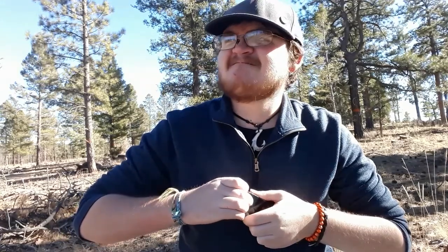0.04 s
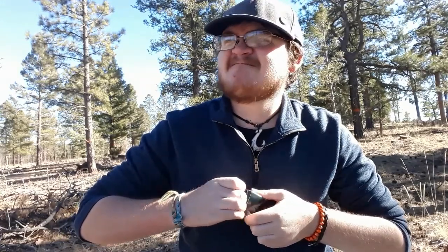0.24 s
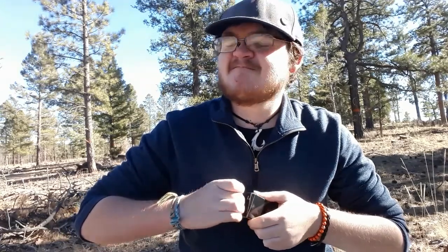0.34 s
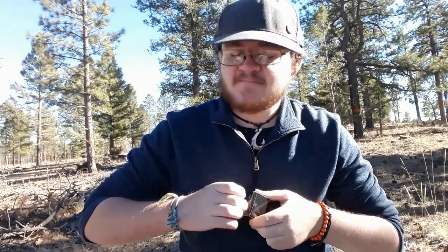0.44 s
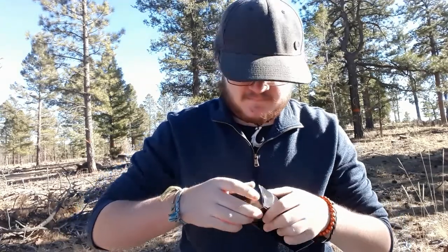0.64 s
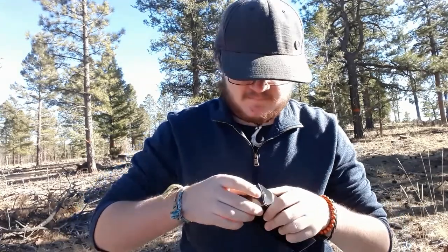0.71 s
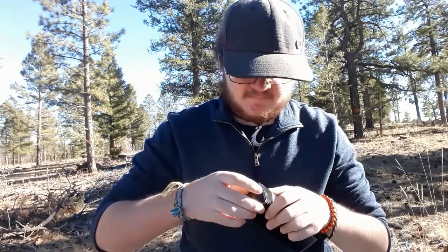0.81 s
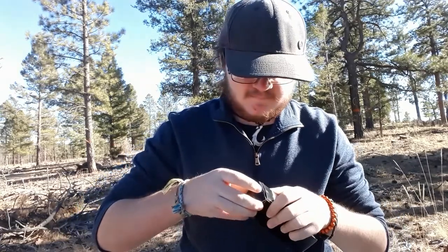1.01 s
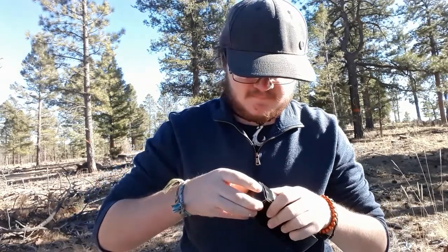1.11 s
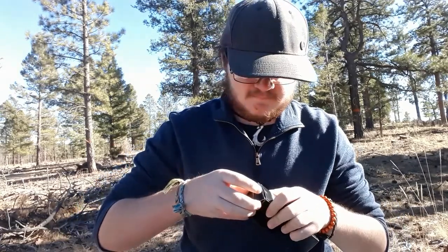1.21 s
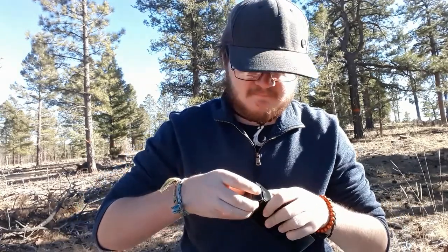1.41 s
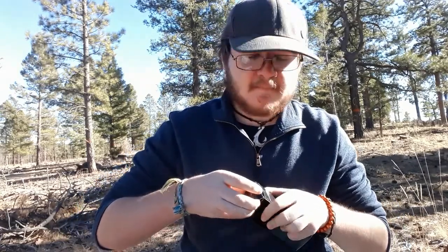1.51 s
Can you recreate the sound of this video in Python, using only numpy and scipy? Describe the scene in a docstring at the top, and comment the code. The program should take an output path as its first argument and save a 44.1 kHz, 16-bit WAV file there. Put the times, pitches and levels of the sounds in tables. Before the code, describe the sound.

A small metal tin is pried open by hand: a tick, a very short scrape and a sharp snap as the lid comes free. Later the loose lid clicks faintly. It is heard close, in quiet outdoor air.

```python
"""The tight lid of a small metal tin, pried off by hand in a quiet wood.
The rim ticks, scrapes in a short run of slips and snaps free. Contacts and slips ring the modes
of the thin metal; the fingers choke them at once. Later the loose lid clicks faintly.
Below: soft handling bumps, skin friction, a weak echo of trees, a low rumble of air, a faint hiss."""
import sys
import numpy as np
from scipy import signal
from scipy.fft import rfft, irfft, next_fast_len
from scipy.io import wavfile

SR = 44100
rng = np.random.default_rng(int(sys.argv[2]) if len(sys.argv) > 2 else 0)


def unload_audio(sound):
    """Save the sound as a 16-bit wav file, at the path given as the first command line argument."""
    columns = np.transpose(np.atleast_2d(sound))
    # keep every value between -1 and 1, then stretch to whole-number steps
    steps = np.round(np.clip(columns, -1, 1) * 32767)
    wavfile.write(sys.argv[1], SR, steps.astype(np.int16))


N = 68355

# modes: tin with lid riding up the rim, tin shut tight, loose lid (frequency [Hz], level [dB], t60 [s])
TIN = [(595, -28, 0.028), (899, -2.5, 0.023), (1075, -3.5, 0.0097), (1413, -16.5, 0.049), (1541, -25, 0.01),
       (1760, -5, 0.017), (2001, -7, 0.026), (2371, -13, 0.025), (2685, -15.5, 0.018), (3364, -18.5, 0.02),
       (4540, -16, .02), (5580, -27.5, 0.012), (6467, -28, 0.0074), (6930, -32.5, 0.0089)]
SHUT = [(680.7, -9.5, 0.014), (937, -6, 0.082), (1160, -8, .03), (1929.6, -0.5, .034), (2524, -15, .025),
        (3362, -21, 0.026), (5370, -9, 0.0076), (7380, -12, 0.012)]
LID = [(584, -7, 0.008), (891, -1, 0.031), (1509, -4.5, 0.037), (1750.6, -0.5, 0.026), (2227, -1.5, 0.0094),
       (2621, -10, 0.024), (3090, -4.5, 0.019), (4738, -10.5, 0.016), (7230, -10.5, .014)]
# lid on rim (time [s], modes, level [dB], tilt [dB/oct], grip pitch [ratio], choke time [s],
# rise [s], relative crack level [dB])
RIM_CONTACTS = [(0.0596, SHUT, -57, 0.5, 1.06, .005, .0016, 0),
                (0.0827, SHUT, -28, 0, 1.018, 0.0049, 0.00066, -13),
                (0.178, TIN, -50.5, -12.5, 1.18, 0.0076, .0012, -15),
                (0.192, TIN, -50, -14, 0.98, 0.011, 0.0006, -10),
                (0.2099, TIN, -22, -9, 1.06, 0.0041, 0.00027, -8.5),
                (0.2349, TIN, -20, 3.5, 0.89, 0.0043, 0.00056, 1),
                (.2370, TIN, -18.5, 6, 1.05, 0.0037, .0004, -7),
                (0.2392, TIN, 1.5, -4.5, 1.03, 0.0047, .0014, -18),
                (0.2463, TIN, -28, 2.5, 1.06, 0.0048, .0007, 0.5),
                (.2660, TIN, -30, -21.5, 0.92, .004, .0005, 2.5),
                (0.2679, TIN, -16, -8, 1.04, .008, .0007, -16),
                (.4680, LID, -62.5, -1, 1.014, 0.0064, 0.0006, -16),
                (0.768, LID, -58, 1, 0.93, 0.0074, 0.00091, 6.5),
                (1.482, LID, -53.5, -11, 0.82, 0.0023, .0003, -3),
                (1.5050, LID, -41.5, 0, 1, 0.0076, 0.00016, -3.5)]
# rim edge catching (time [s], level [dB])
EDGE_TICKS = [(.0829, -35.5), (.2095, -40.5), (0.219, -34), (.2385, -33), (1.5052, -56)]
# rim sliding under the lid (time [s], modes, length [s], level [dB], start tilt [dB/oct],
# end tilt [dB/oct], slip rate [Hz], unevenness [0-1], relative grit level [dB])
RIM_SCRAPES = [(0.064, SHUT, .018, -60.5, -11, -13.5, 1000, 0.14, -31),
               (0.2028, TIN, .006, -46, -15.5, 0.5, 1103, 0.14, -17),
               (0.2149, TIN, 0.011, -23.5, -6.5, 5, 1084, .085, -11),
               (.229, TIN, 0.0068, -39, 1.5, -1.5, 1097, 0.13, -10.5),
               (0.247, TIN, .007, -39.5, -1.5, -0.5, 1002, 0.27, -10.5),
               (0.255, TIN, 0.013, -47, 1, 0, 1009, .4, -9),
               (.272, TIN, 0.01, -50.5, -2, -2, 1050, .4, -11.5),
               (1.509, LID, 0.044, -64.5, 3.5, 1, 906, 0.49, -7.5)]
# hands on the tin (time [s], level [dB], pitch [Hz], half-width [s])
HAND_BUMPS = [(.061, -55, 152, 0.0058), (.171, -45, 115, 0.0059), (0.224, -43, 595, 0.00303),
              (0.2392, -30.5, 480, .002), (0.242, -42, 220, .003), (0.2664, -34.5, 301.6, .002),
              (.278, -43, 364, .003), (0.801, -48.5, 113, .012)]
# fingertips sliding on metal (time [s], level [dB], half-width [s])
FINGER_RUBS = [(0.102, -62.5, 0.031), (0.292, -58, 0.023), (1.53, -66.5, 0.049)]
# noise spectra (frequency [Hz], relative level [dB])
CRACK_SPECTRUM = [(300, -12), (1000, -4), (2500, 3), (5000, -2.5), (7000, -5), (9000, -16.5), (13000, -10),
                  (16000, -17.5)]
TICK_SPECTRUM = [(3000, -21), (7000, -6.5), (9000, -5.5), (10500, 1.5), (13500, 1), (15500, -7.5)]
GRIT_SPECTRUM = [(300, -9.5), (1000, -2.5), (2500, -3), (3900, -8.5), (4700, -1), (5600, -6), (6700, -0.5),
                 (9000, -18), (13000, -4.5), (16000, -17)]
RUSTLE_SPECTRUM = [(40, -5), (150, -1), (300, -2), (600, -16.5), (1500, -45.5), (4000, -78.5)]
SKIN_SPECTRUM = [(200, -1), (500, 2), (1200, -4), (2200, -5), (4000, -14.5), (8000, -17.5), (15000, -15.5)]
RUMBLE_SPECTRUM = [(20, -20), (40, -7), (70, 5), (110, -0.5), (150, -8), (220, -30.5), (400, -28),
                   (1000, -45.5), (3000, -82)]
HISS_SPECTRUM = [(120, -29), (250, -3), (550, -6.5), (1200, -11.5), (3000, -15.5), (6000, -18.5),
                 (9000, -15), (14000, -13.5), (16000, -19)]
# reflections: hands and chest, trees (frequency [Hz], relative level [dB])
SCATTER_SPECTRUM = [(150, -4.5), (500, 3), (900, -7.5), (1400, 1), (2400, 3), (4000, -8), (13000, -5)]
TREE_SPECTRUM = [(100, 5.5), (350, 10.5), (1000, -6), (2200, -1), (6000, 4.5), (15000, 5.5)]
# rumble envelope (time [s], relative level [dB])
RUMBLE_ENVELOPE = [(0.0, -40.5), (0.03, -66), (0.137, -57.5), (0.176, -58.5), (0.198, -64), (0.232, -55.5),
                   (0.426, -73), (0.46, -60.5), (0.577, -65), (0.694, -58.5), (0.728, -65.5), (0.808, -53),
                   (0.84, -66.5), (1.0, -60), (1.19, -62.5), (1.242, -66.5), (1.324, -61), (1.466, -67),
                   (1.55, -67.5)]
# stereo width of the hiss (frequency [Hz], relative side level [dB])
HISS_WIDTH = [(60, 1.5), (130, 1), (290, -2.5), (640, 0.5), (1410, 1.5), (3100, 0.5), (6820, -0.5),
              (15000, -33)]

MODE_DETUNE, MODE_SPREAD_DB, CHOKE_STEEPNESS = 0.02, 1, 5.93
CRACK_T60_S, TICK_T60_S = 0.018, 0.0085
SLIP_SCATTER_DB, SCRAPE_RISE_S, SCRAPE_FALL_S = 1.53, 0.001794, 0.0021
RUSTLE_DB, RUMBLE_GAIN_DB, HISS_DB = -12.5, 4, -67
SCATTER_DB, TREE_DB, LEFT_LAG_S = -15, -34, 12e-6
PEAK_LIMIT, TOP_HZ = 0.86, 16000


def amp(db):
    return 10 ** (np.asarray(db) / 20)


def along(points, hz):
    """Interpolate (frequency [Hz], value) points on a log axis."""
    point_hz, values = np.transpose(points)
    return np.interp(np.log(hz + 1), np.log(point_hz), values)


def filtered(x, response):
    """Apply a frequency response."""
    size = x.shape[-1]
    padded = next_fast_len(size + 8192)
    return irfft(rfft(x, padded) * response(np.fft.rfftfreq(padded, 1 / SR)), padded)[..., :size]


def noise(spectrum, size, side_db, width=((1000, 0),)):
    """Shaped stereo noise, rms 1; side_db and width set side over mid."""
    def gains(hz):
        mid_db = along(spectrum, hz)
        return amp([mid_db, mid_db + along(width, hz) + side_db])
    mid, side = filtered(rng.standard_normal((2, size)), gains)
    stereo = np.array([mid + side, mid - side])
    return stereo / np.sqrt(np.mean(stereo ** 2) + 1e-20)


def swell(peak_s, half_width_s):
    """Gaussian envelope."""
    return np.exp(-((np.arange(N) / SR - peak_s) / half_width_s) ** 2 / 2)


def add(track, start_s, sound):
    part = track[:, round(start_s * SR):][:, :sound.shape[-1]]
    part += sound[..., :part.shape[-1]]


def tin_ring(t, modes, tilt_db_oct, pitch, choke_s):
    """Decaying modes, detuned by each grip, choked by the fingers; gains differ per channel."""
    hz, db, t60_s = np.transpose(modes)[:, :, None]
    octaves = np.log2(hz / 1000)
    hz = hz * pitch * np.exp(MODE_DETUNE * rng.standard_normal(hz.shape))
    partials = amp(db + tilt_db_oct * octaves - 60 * t / t60_s) * np.sin(2 * np.pi * hz * t)
    choke = 1 / (1 + (t / choke_s) ** CHOKE_STEEPNESS)
    gains = amp(MODE_SPREAD_DB * rng.standard_normal((2, len(modes))))
    polarity = (-1) ** np.arange(len(modes))
    return (gains * polarity) @ (partials * choke)


def lid_clicks():
    """Lid strikes rim: a brief crack and a short ring."""
    out, t = np.zeros((2, N)), np.arange(SR // 10) / SR
    for start_s, modes, db, tilt_db_oct, pitch, choke_s, rise_s, crack_db in RIM_CONTACTS:
        crack = amp(crack_db - 60 * t / CRACK_T60_S) * noise(CRACK_SPECTRUM, len(t), side_db=-6) / 2
        ring = tin_ring(t, modes, tilt_db_oct, pitch, choke_s)
        attack = 1 - np.exp(-(t / rise_s) ** 2)
        add(out, start_s, amp(db) * attack * (ring + crack))
    return out


def edge_ticks():
    """The sharp edge catches: a short, bright noise burst."""
    out, t = np.zeros((2, N)), np.arange(SR // 20) / SR
    for start_s, db in EDGE_TICKS:
        add(out, start_s, amp(db - 60 * t / TICK_T60_S) * noise(TICK_SPECTRUM, len(t), side_db=-4.5))
    return out


def rim_scrapes():
    """Stick-slip pulses near 1 kHz drive the modes; tilt shifts along the stroke, grit on top."""
    out, t = np.zeros((2, N)), np.arange(SR // 10) / SR
    for start_s, modes, length_s, db, start_db_oct, end_db_oct, slip_hz, uneven, grit_db in RIM_SCRAPES:
        gaps, sizes = rng.standard_normal((2, 64))
        slip_s = np.cumsum(np.exp(uneven * gaps)) / slip_hz
        slip_samples = ((slip_s - slip_s[0]) * SR).astype(int)
        slips = np.bincount(slip_samples, amp(SLIP_SCATTER_DB * sizes), len(t))[:len(t)]
        travel = np.minimum(t / length_s, 1)
        metal = 0
        for tilt_db_oct, share in (start_db_oct, 1 - travel), (end_db_oct, travel):
            ring = tin_ring(t, modes, tilt_db_oct, pitch=1.04, choke_s=0.0026)
            driven = signal.fftconvolve(ring, slips[None], axes=1)[:, :len(t)]
            metal += share * driven / np.sqrt(np.mean(driven[:, t < length_s] ** 2))
        grit = amp(grit_db) * noise(GRIT_SPECTRUM, len(t), side_db=-5.5)
        attack = np.minimum(t / SCRAPE_RISE_S, 1)
        release = np.exp(-np.maximum(t - length_s, 0) / SCRAPE_FALL_S)
        add(out, start_s, amp(db) * attack * release * (metal + grit))
    return out


def hand_bumps():
    """Dull pushes on the tin: a few cycles of tone plus a low rustle."""
    t = np.arange(N) / SR
    rustle = amp(RUSTLE_DB) * noise(RUSTLE_SPECTRUM, N, side_db=-3.5)
    return sum(amp(db) * swell(peak_s, half_width_s) * (np.sin(2 * np.pi * hz * (t - peak_s)) + rustle)
               for peak_s, db, hz, half_width_s in HAND_BUMPS)


def finger_rubs():
    """Faint skin friction as the grip shifts."""
    envelope = sum(amp(db) * swell(peak_s, half_width_s) for peak_s, db, half_width_s in FINGER_RUBS)
    return envelope * noise(SKIN_SPECTRUM, N, side_db=-3)


def echo(x, spectrum, t60_s):
    """Diffuse reflections: a decaying noise tail, different per channel."""
    t = np.arange(SR // 2) / SR
    attack = 1 - np.exp(-t / 0.001)
    tail = noise(spectrum, len(t), side_db=0) * amp(-60 * t / t60_s) * attack
    return signal.fftconvolve(x, tail / np.linalg.norm(tail[0]), axes=1)[:, :N]


def open_air():
    """Restless low rumble of air and a steady faint hiss."""
    rumble_db = RUMBLE_GAIN_DB + np.interp(np.arange(N) / SR, *np.transpose(RUMBLE_ENVELOPE))
    rumble = amp(rumble_db) * noise(RUMBLE_SPECTRUM, N, side_db=0.5)
    hiss = amp(HISS_DB) * noise(HISS_SPECTRUM, N, side_db=-1, width=HISS_WIDTH)
    return rumble + hiss


def scene():
    """Tin, scatter off hands and chest, tree echo, skin and air."""
    tin = lid_clicks() + edge_ticks() + rim_scrapes() + hand_bumps()
    delay_s = np.array([[0.5], [-0.5]]) * LEFT_LAG_S
    tin = filtered(tin, lambda hz: np.exp(-2j * np.pi * hz * delay_s))
    scatter = amp(SCATTER_DB) * echo(tin, SCATTER_SPECTRUM, t60_s=0.043)
    trees = amp(TREE_DB) * echo(tin, TREE_SPECTRUM, t60_s=0.45)
    return tin + scatter + trees + finger_rubs() + open_air()


def record(dry):
    """Soft peak limit, then brick-wall low-pass."""
    rounded = dry / (1 + np.abs(dry / PEAK_LIMIT) ** 8) ** (1 / 8)
    return filtered(rounded, lambda hz: hz < TOP_HZ)


dry = scene()
out = record(dry)
unload_audio(out)
```